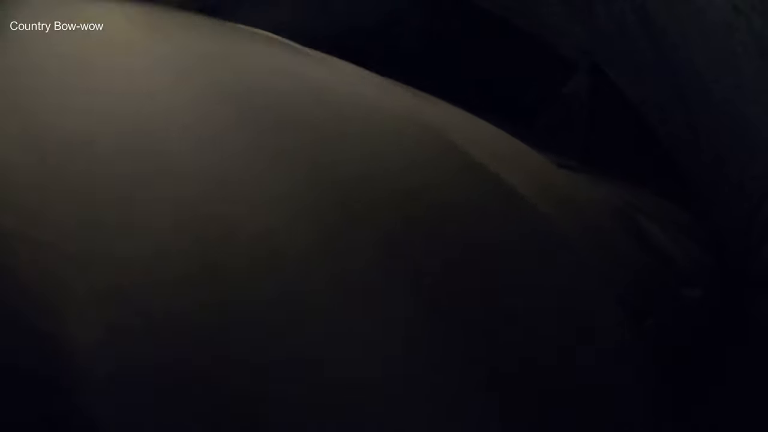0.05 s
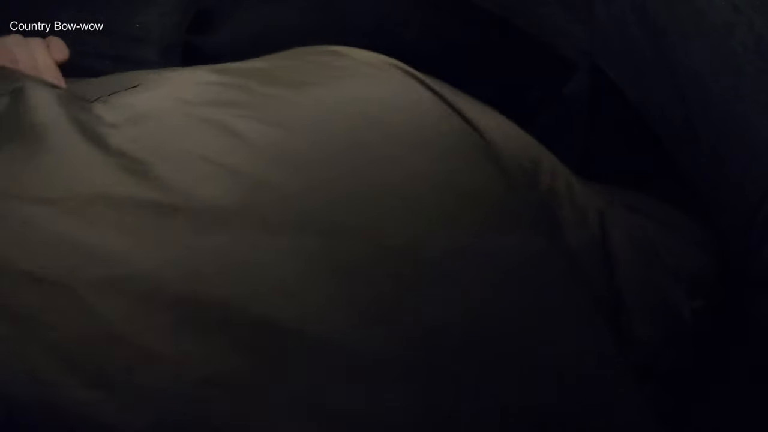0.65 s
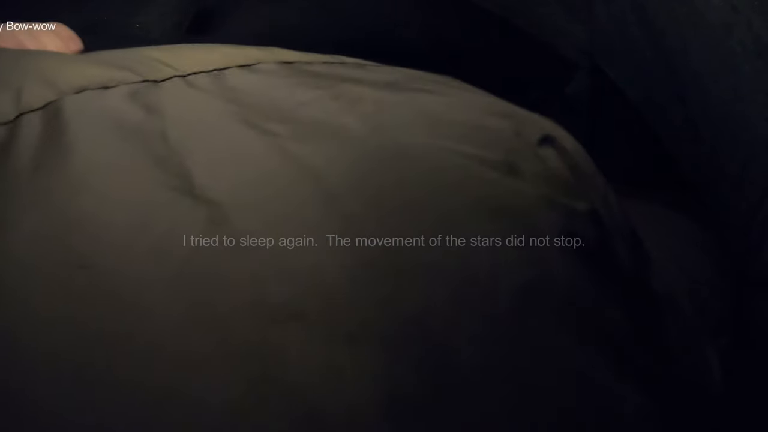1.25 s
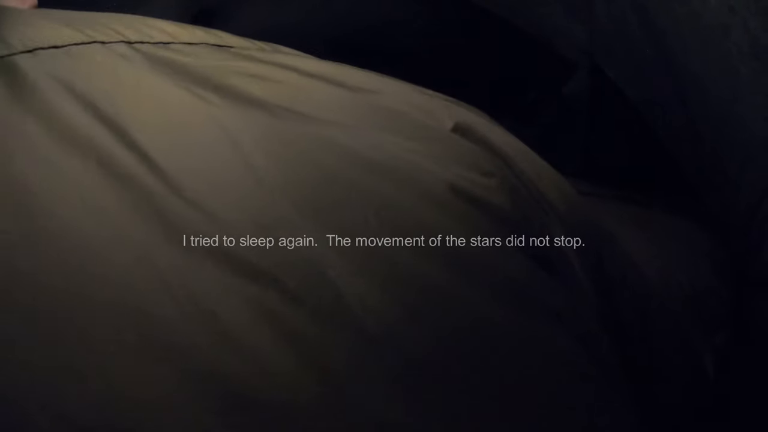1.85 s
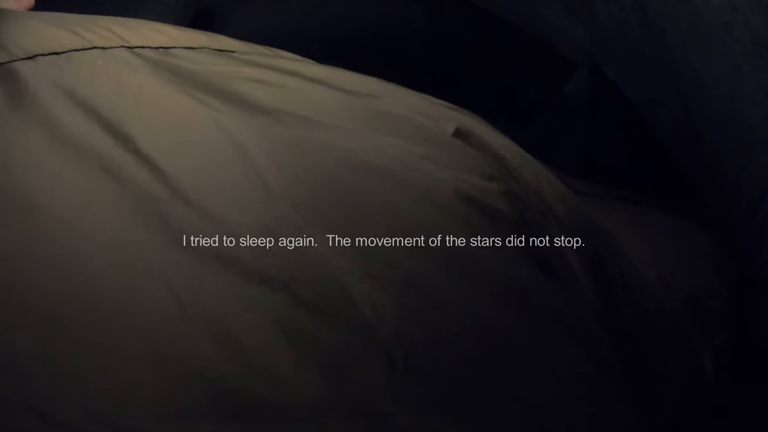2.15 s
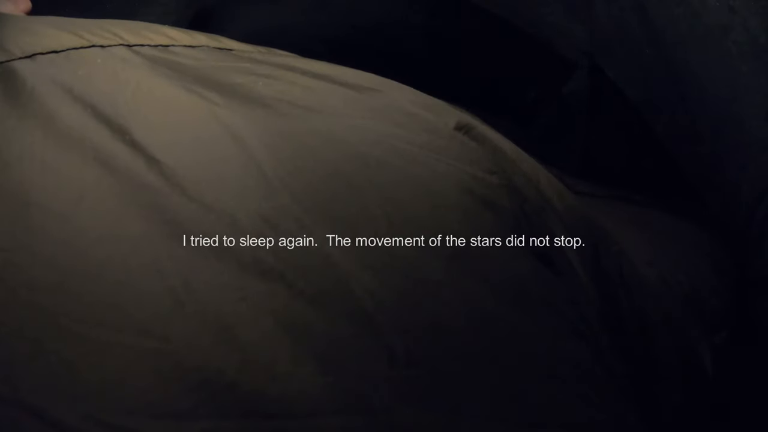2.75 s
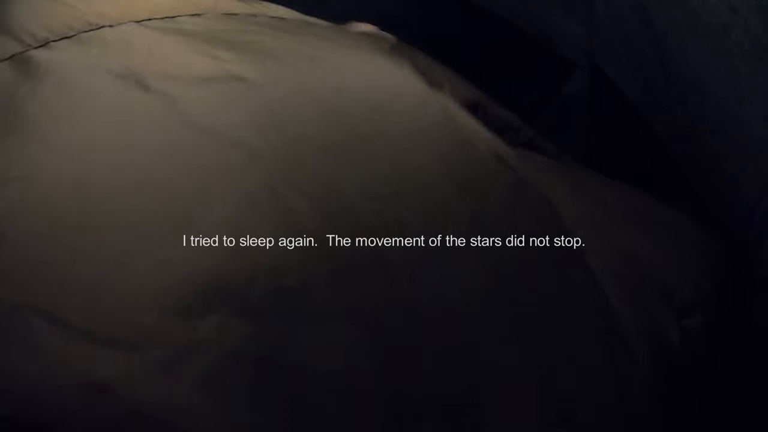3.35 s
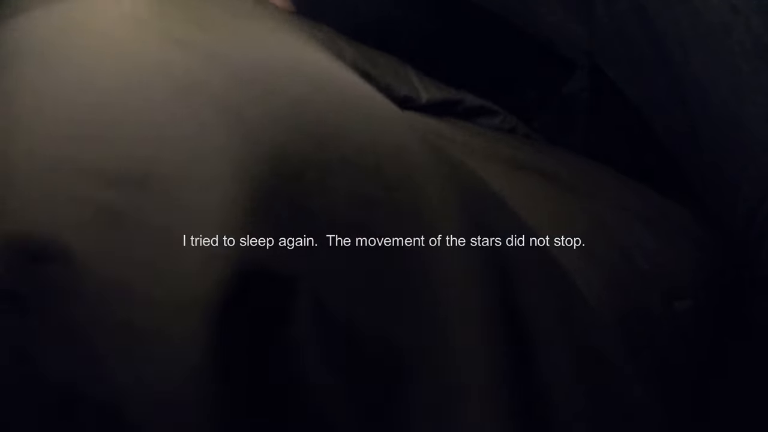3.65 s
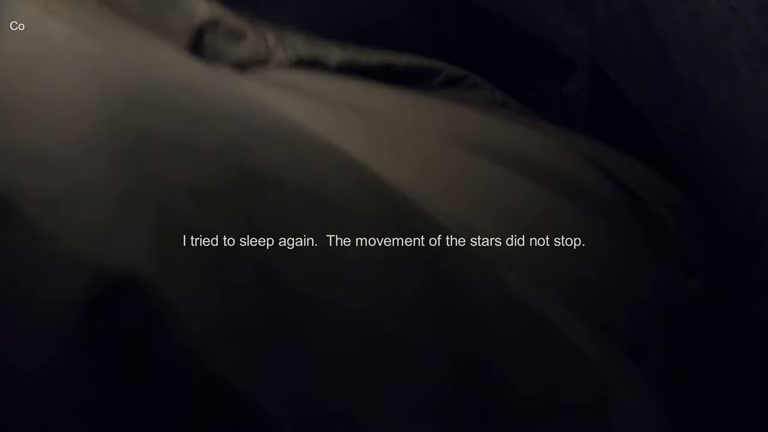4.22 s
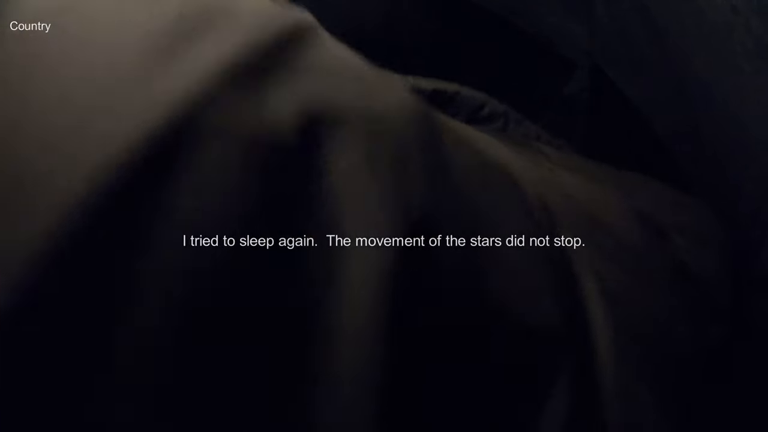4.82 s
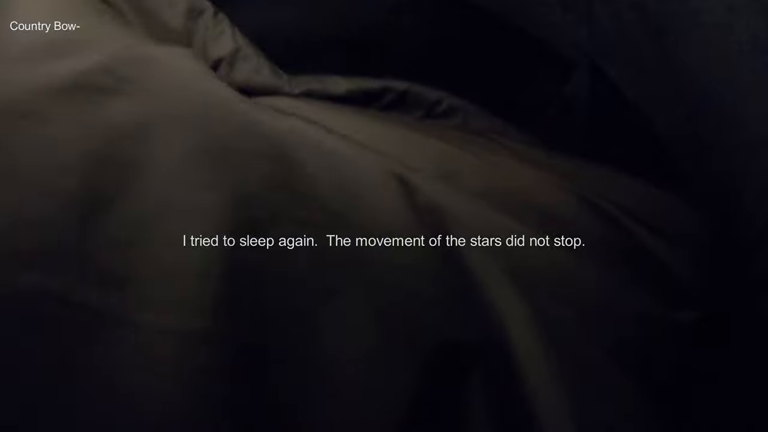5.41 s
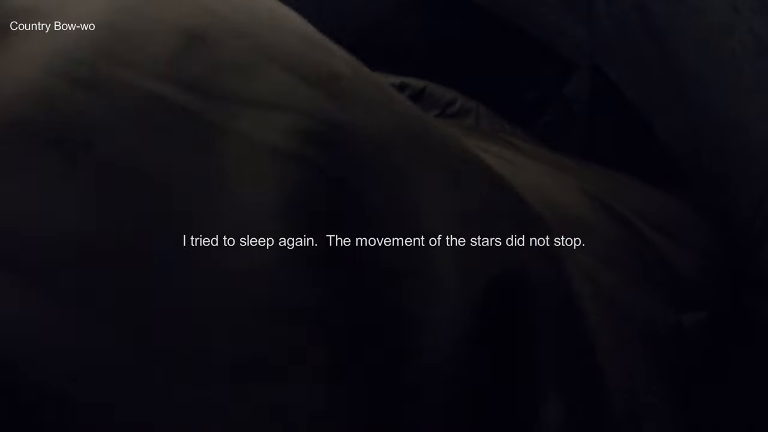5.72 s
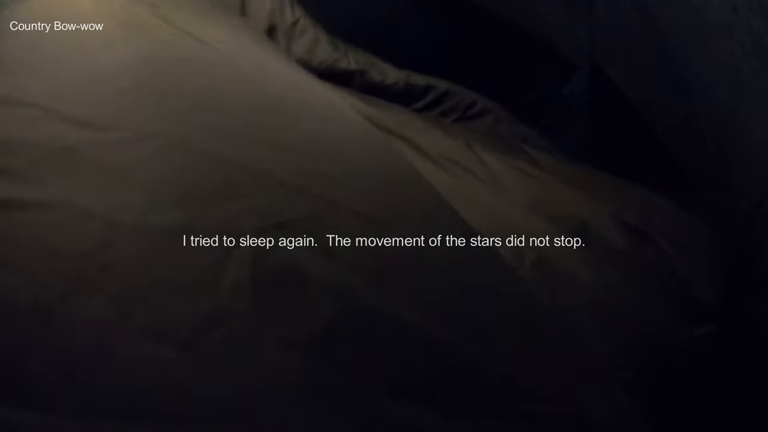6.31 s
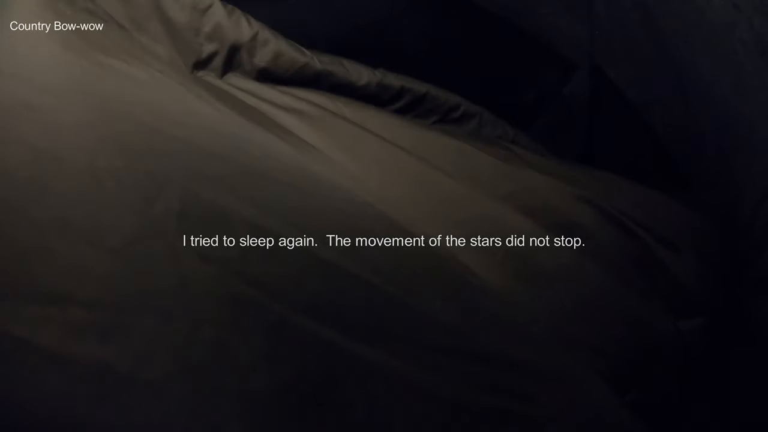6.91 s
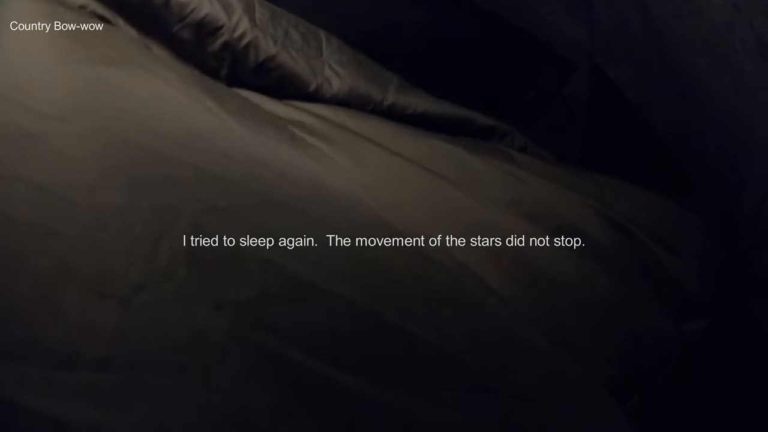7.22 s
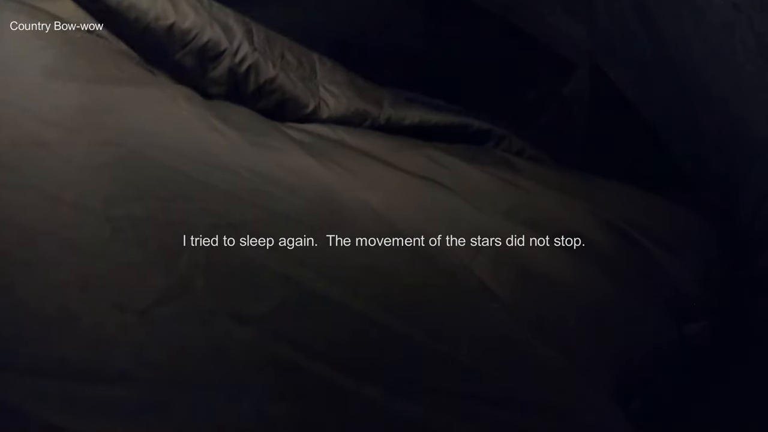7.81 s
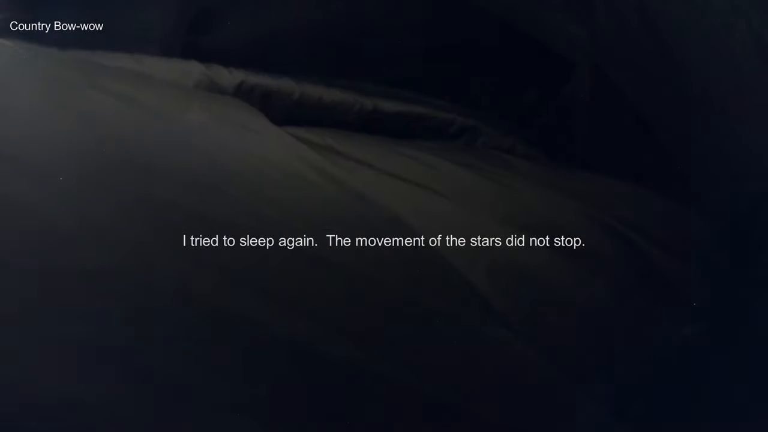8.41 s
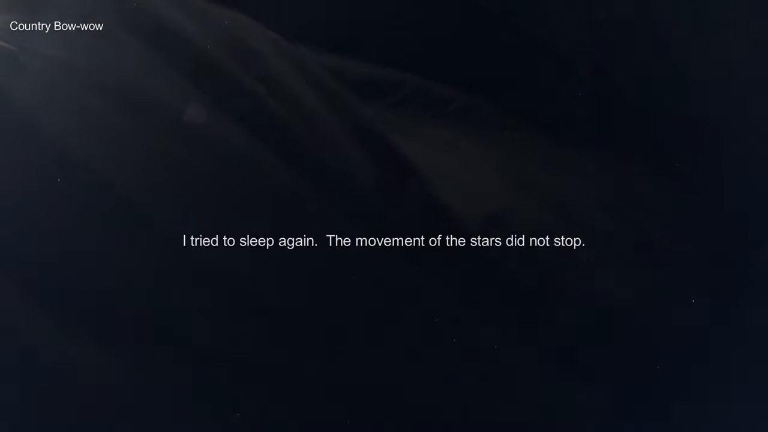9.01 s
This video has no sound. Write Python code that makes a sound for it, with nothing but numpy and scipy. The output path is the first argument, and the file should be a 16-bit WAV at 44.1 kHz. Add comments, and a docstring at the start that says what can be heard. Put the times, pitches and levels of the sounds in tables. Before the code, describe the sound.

A nylon sleeping bag rustles and crinkles up close as someone shifts in it, with dull bumps and a brief low groan of dragging cloth.

```python
"""A nylon sleeping bag rustles in swells as someone shifts in it, inside a tent, right against a camera.
Its threads slip and its creases crinkle; quick strokes make the weave sing, and a few stiff creases snap.
Once the cloth drags over the camera body, sticking and slipping so fast that it groans.
Folds bump the camera with dull thuds, and the padding pushes puffs of air at the microphones."""
import sys
import numpy as np
from scipy import signal
from scipy.fft import rfft, irfft
from scipy.io import wavfile

SR = 44100
rng = np.random.default_rng(int(sys.argv[2]) if len(sys.argv) > 2 else 0)


def waveform_to_disk(signal):
    """Save audio, clipped to [-1, 1], as 16-bit WAV at the path in sys.argv[1]."""
    frames = np.transpose(np.atleast_2d(signal))
    scaled = np.clip(frames, -1, 1) * 32767
    samples = np.round(scaled).astype(np.int16)
    wavfile.write(sys.argv[1], SR, samples)


N = 403956
TIME = np.arange(N) / SR
FREQ = np.maximum(np.arange(N // 2 + 1) * SR / N, 1)

# cloth dragging over the camera: t/s, slip rate/Hz, level/dB
CLOTH_DRAG = [(3.19, 66.64, -58), (3.31, 62.8, -35), (3.39, 71.3, -24), (3.48, 80.3, -22.5),
              (3.505, 51.3, -28), (3.555, 48.1, -25.5), (3.62, 86.83, -16), (3.645, 129.6, -15.5),
              (3.69, 136.5, -14), (3.745, 100, -12), (3.78, 76.4, -12), (3.815, 116.1, -11.5),
              (3.86, 106.6, -10.5), (3.925, 91.9, -10), (3.98, 91.06, -9.5), (4.01, 116.4, -10),
              (4.05, 122.3, -10), (4.078, 101, -9.5), (4.1, 55, -26), (4.12, 44.7, -45)]


def sliding_nylon(rub_db, body_db, sheen_db, pan_db, slosh_hz=1370, slosh_width_hz=130, slosh_db=7):
    """Countless slipping threads hiss: the padding gives a low body, the smooth face a high sheen."""
    # tone of the sliding cloth: f/Hz, level/dB
    cloth_tone = [(40, -9), (105, -18), (150, 2.5), (300, -1.5), (600, 0), (1150, -5), (1700, -4),
                  (2150, -1), (2600, -1.5), (3300, -5), (4800, -9), (15000, -8.5)]
    # stereo width: f/Hz, side level relative to middle/dB
    stereo_width = [(110, -6), (380, -15.5), (700, -4.5), (1150, 1.5), (1700, -3.5), (2300, -7), (4400, -5),
                    (8100, 1), (15000, -1)]
    # how the two microphone openings colour the sound: f/Hz, left/dB, right/dB
    openings = [(500, 0.5, 1), (750, -0.5, -0.5), (1060, 2.5, -5.5), (1480, 0.5, 0), (2730, -2.5, -4),
                (4930, -1, -1), (6780, -2, 2), (8050, -3, -2), (9400, -0.5, -0.5), (10020, -1.5, -8.5),
                (11400, -16.5, -16.5), (14300, -20.5, -23), (15600, -32, -33)]
    creases = undb(-22) * crinkle(per_s=260, spread_db=2.5, decay_s=0.0019)
    grip = undb(0.53 * wander(19)) * np.sqrt(1 + creases)
    mid, side = rng.standard_normal((2, N)) * grip
    # air sloshing between the openings rings, pushing on one as it pulls on the other
    side = shape(side, colour(stereo_width) * undb(slosh_db * band(slosh_hz, slosh_width_hz)))
    opening_gains = np.array([colour(np.array(openings)[:, [0, k]]) for k in (1, 2)])
    cloth = shape(np.array([mid + side, mid - side]), colour(cloth_tone) * opening_gains)
    # the padding crumples in slower, coarser steps than the face
    crumple = np.sqrt(1 + undb(-13.5) * crinkle(per_s=140, spread_db=2.5, decay_s=0.0027))
    body_share = 1 / (1 + (FREQ / 1700) ** 8)
    sheen_share = 1 / (1 + (5000 / FREQ) ** 6)
    zones = [(body_share, 500, 1400, undb(body_db - 2.87) * crumple),
             (1 - body_share - sheen_share, 1800, 4500, undb(1.14)),
             (sheen_share, 5500, 11000, undb(sheen_db - 1.67))]
    out = 0
    for share, low_hz, high_hz, gain in zones:
        strength = np.std(shape(cloth.mean(axis=0), (FREQ > low_hz) & (FREQ < high_hz)))
        out = out + shape(cloth, share) * gain / strength
    return out * undb(rub_db + np.array([pan_db, -pan_db]) / 2)


def body_shifts(rest_db=-51.5, rest_body_db=-2.5, rest_sheen_db=1.5):
    """Each shift adds its power to a faint, steady creep. Gives rubbing, body, sheen and pan in dB."""
    # the person's movements: start/s, rise/s, hold/s, release/s, rubbing level/dB,
    # relative body/dB, relative sheen/dB, left minus right/dB
    moves = [(-0.24, 0.31, 0.026, 0.11, -28, -6, -1.5, 0), (0.022, 0.21, 0.11, 0.26, -29, -3, -2, 0.3),
             (0.37, 0.15, 0.46, 0.07, -32, -4, -0.5, -0.3), (0.972, 0.23, 0.12, 0.17, -32.5, -4, 0, -2),
             (1.409, 0.11, 0.044, 0.094, -32, -4.5, -1.5, -1),
             (1.59, 0.059, 0.086, 0.129, -37.5, -5, -0.5, -1.6),
             (1.794, 0.15, 0.073, 0.055, -37, -5, -3.0, -1),
             (2.008, 0.072, 0.081, 0.028, -42, -3, -2, -1.6),
             (2.058, 0.23, 0.092, 0.2, -43.2, -5, -0.5, -1.5),
             (2.476, 0.16, 0.079, 0.171, -42.4, -5, -4, -0.5),
             (2.767, 0.12, 0.01, 0.084, -37, -6, -3.3, 0.5),
             (2.893, 0.12, 0.1, 0.04, -40.5, -7, -3.5, -0.6), (3.095, 0.25, 0.14, 0.11, -30, -5, -3, 1),
             (3.475, 0.18, 0.19, 0.14, -26, -6, -4, 1.1), (3.763, 0.23, 0.077, 0.14, -28.5, -3.5, -3.5, 2),
             (3.956, 0.25, 0.13, 0.09, -35.5, -3, -2.5, -0.1),
             (4.28, 0.16, 0.014, 0.15, -30.5, -2.2, -1, -0.9),
             (4.476, 0.093, 0.3, 0.056, -34.5, -2, 0.3, 0), (4.837, 0.099, 0.14, 0.081, -32, -1.2, -1, 0.8),
             (5.049, 0.075, 0.066, 0.395, -30.5, -3, 0, 1),
             (5.224, 0.1, 0.078, 0.083, -32.3, -1.8, -1.5, 1.4),
             (5.287, 0.31, 0.36, 0.076, -35.5, -0.9, -2.5, 0),
             (5.721, 0.28, 0.068, 0.2, -35.5, -2, -3, 0.4), (6.052, 0.15, 0.1, 0.26, -33.5, -2, -1.3, 0.5),
             (6.377, 0.16, 0.096, 0.13, -31.9, -1.2, -1.5, 1.3),
             (6.715, 0.047, 0.033, 0.033, -40.5, -4, -6.5, -0.5),
             (6.767, 0.17, 0.05, 0.14, -38.5, -2.5, -3.5, 0.9),
             (7.016, 0.079, 0.1, 0.24, -38, -2.5, -3, 1.2), (7.075, 0.33, 0.114, 0.048, -42.5, -1, -4, 1.5),
             (7.504, 0.13, 0.01, 0.18, -41, 0.5, -12, 4.0), (7.656, 0.134, 0.35, 0.111, -47, 1, -18, 1.9),
             (7.972, 0.086, 0.24, 0.035, -36.5, -2.5, -4, 1.5), (8.139, 0.14, 0.01, 0.1, -36, -3.5, -3, 0),
             (8.24, 0.41, 0.015, 0.242, -36, -0.2, -3, 2), (8.552, 0.24, 0.18, 0.078, -41.5, -4.5, -2.5, 0)]
    rub = np.full(N, undb(rest_db) ** 2)
    body = rub * undb(rest_body_db) ** 2
    sheen = rub * undb(rest_sheen_db) ** 2
    pan = np.zeros(N)
    for start, rise_s, hold_s, release_s, db, body_db, sheen_db, pan_db in moves:
        power = (undb(db) * gesture(start, rise_s, hold_s, release_s, sag_db=-1.26)) ** 2
        rub += power
        body += power * undb(body_db) ** 2
        sheen += power * undb(sheen_db) ** 2
        pan += power * pan_db
    return 10 * np.log10(rub), 10 * np.log10(body / rub), 10 * np.log10(sheen / rub), pan / rub


def crinkle(per_s, spread_db, decay_s):
    """Tiny creases buckle at random and die away at once. Gives their power, averaging one."""
    sizes = undb(spread_db * np.minimum(rng.standard_exponential(N), 4)) ** 2
    buckles = sizes * (rng.random(N) < per_s / SR)
    power = signal.lfilter([1], [1, -np.exp(-1 / (decay_s * SR))], buckles)
    return power / power.mean()


def nearby_folds(rustle, hollow_hz=1480, hollow_width_hz=800):
    """Cloth close to the microphones muffles the middle pitches and reflects the higher ones."""
    # shading by the folds: t/s, gain around hollow_hz/dB
    shading = [(0, 2.5), (1.0, -2), (1.9, -0.5), (3.1, -4), (3.7, -6.5), (4.3, -2), (6.5, -1.1), (7.5, -2),
               (8.3, 0.5)]
    shade_db, = curves(shading)
    rustle = rustle + (undb(shade_db) - 1) * shape(rustle, band(hollow_hz, hollow_width_hz))
    highs = shape(rustle, 1 / (1 + (650 / FREQ) ** 6))
    return rustle - highs + fold_echo(highs)


def fold_echo(sound, lag_s=0.001069, drift=0.305, echo_db=-11):
    """An echo off the nearest fold cancels some pitches; they shift as its delay wanders."""
    index = np.arange(N)
    echo = [np.interp(index - SR * lag_s * np.exp(drift * wander(1.56)), index, channel)
            for channel in sound]
    return (sound + undb(echo_db) * np.array(echo)) / np.sqrt(1 + undb(echo_db) ** 2)


def singing_weave():
    """Threads of one layer tick across those of another: the faster, the higher the breathy note."""
    # quick strokes: t/s, half length/s, thread crossing rate/Hz, level/dB
    strokes = [(0.073, 0.044, 3750, -30.5), (0.61, 0.14, 2100, -33.5), (1.227, 0.15, 6600, -34),
               (1.25, 0.13, 1490, -35), (2.88, 0.041, 700, -43.5), (3.38, 0.046, 470, -44),
               (3.68, 0.11, 986, -35), (3.72, 0.082, 3160, -41), (4.04, 0.042, 720, -32.5),
               (4.70, 0.07, 8900, -30), (6.31, .05, 6850, -34), (6.55, .07, 6500, -41)]
    return swells(strokes, channels=2, relative_width=0.19)


def crease_snaps(decay_s=0.0038, relative_width=2.2):
    """A stiff crease hisses as it tightens, then flips over with a short tick."""
    # snapping creases: t/s, level/dB, tightening time/s, f/Hz
    creases = [(0.095, -31, 0.05, 4500), (2.620, -30.5, 0.0005, 3500), (2.884, -37, 0.003, 2600),
               (7.645, -39, 0.025, 2600), (8.294, -27, 0.026, 2800), (9.101, -34.5, 0.0004, 4000)]
    treble_cut = 1 + (FREQ / 9800) ** 24
    out = 0
    for s, db, tighten_s, hz in creases:
        strain = np.exp(np.minimum((TIME - s) / tighten_s, (s - TIME) / decay_s))
        out = out + undb(db) * strain * noise(band(hz, hz * relative_width) / treble_cut, (2, N))
    return out


def slip_cycle(jitter=0.022):
    """Dragged cloth sticks and slips, never quite evenly. Gives the cycle's phase and when it drags."""
    hz, _ = curves(CLOTH_DRAG)
    phase = 2 * np.pi * np.cumsum(hz * (1 + jitter * wander(59))) / SR
    dragging = (TIME > CLOTH_DRAG[0][0]) & (TIME < CLOTH_DRAG[-1][0])
    return phase, dragging


def judder(phase, rolloff_db=-11, scrape_db=-1, scrape_hz=230, scrape_width_hz=360):
    """Cloth grips the camera and lets go, twice a cycle if pressed hard. Gives groan and bare motion."""
    # moments when the cloth bears down: t/s, half length/s, pressure/0-1
    grabs = [(3.754, 0.011, 0.72), (3.875, 0.035, 0.3), (3.955, 0.061, 0.86), (4.079, 0.025, 0.54)]
    hz, db = curves(CLOTH_DRAG)
    pressure = sum(force * np.exp(-((TIME - s) / half_s) ** 2) for s, half_s, force in grabs)
    second_slip_db = -17 + 26 * pressure
    second_slip = undb(second_slip_db + 1.1 * wander(50)) * np.sin(2 * phase + 0.61 * wander(32))
    motion = (np.sin(phase) + second_slip) / np.hypot(1, undb(second_slip_db))
    # letting go suddenly adds grit (overtones and a scrape), 9 dB more per octave of slowing
    grit_db = -21 + pressure - 9 * np.log2(hz / hz.max())
    overtones = sum(undb(rolloff_db * (k - 3) + 2.1 * wander(53)) * np.sin(k * phase + 0.5 * wander(49))
                    for k in range(3, 8))
    scrape = unit(noise(band(scrape_hz, scrape_width_hz)) * (2 + motion))
    tone = np.sqrt(2) * (motion + undb(grit_db) * overtones)
    groan = undb(db + 0.36 * wander(40)) * (tone + undb(grit_db + scrape_db) * scrape)
    return groan, motion


def fold_bumps(rub_db, crest_cycles=0.59, damping=3.8, scuff_db=-22):
    """A fold dents in and springs back: one quickly dying swing, with a little scuff."""
    thuds, contact_power = np.zeros((2, N))
    scuff = noise(band(280, 280))
    for s, db, hz in fold_touches(rub_db):
        cycles = np.arange(int(4 * SR / hz)) * hz / SR
        age = cycles / crest_cycles
        force = undb(db) * (age * np.exp(1 - age)) ** damping
        start = s - 0.75 / hz  # the main upward swing lands near time s
        add(thuds, start, -force * np.sin(2 * np.pi * cycles))
        add(contact_power, start, force ** 2)
    return thuds + undb(scuff_db) * np.sqrt(contact_power) * scuff


def fold_touches(rub_db, skip_gap_s=0.0175, skip_jitter_s=0.00174, taps_per_s=4.6, tap_hz=290):
    """Folds bump, skip along and lightly tap the camera. Gives rows of t/s, level/dB, f/Hz."""
    # single bumps: t/s, level/dB, f/Hz
    bumps = [(0.255, -23, 69.5), (0.953, -24.5, 280), (1.252, -29, 60), (1.714, -19.5, 520),
             (2.154, -32, 250), (2.570, -37, 380), (3.029, -28, 300), (3.052, -25.5, 89), (3.118, -35, 170),
             (3.993, -10, 55), (4.103, -2.5, 75), (4.421, -22, 650), (4.452, -6.5, 48), (4.8376, -11, 333),
             (4.89, -19, 330), (5.218, -13, 81), (5.318, -17.5, 120), (5.358, -19.5, 32),
             (5.452, -21.5, 58), (5.601, -17, 46), (5.918, -17, 169), (6.639, -10, 54), (6.654, -8, 142),
             (6.696, -6.5, 51.3), (6.889, -24.5, 330), (7.085, -27, 330), (7.125, -29, 50.3),
             (7.298, -28, 44.6), (7.372, -32, 40), (7.49, -22, 374), (7.634, -21, 280), (8.582, -22.5, 330)]
    # folds that catch and skip: start/s, length/s, first level/dB, first f/Hz
    skip_runs = [(4.43, 0.078, -2.5, 140), (6.247, 0.058, -13.5, 158), (6.565, 0.04, -18.5, 109),
                 (7.479, 0.026, -22.5, 208), (7.655, 0.068, -22, 80)]
    touches = list(bumps)
    for start, length_s, db, hz in skip_runs:
        for age in np.arange(0, length_s, skip_gap_s):
            s = start + age + skip_jitter_s * rng.standard_normal()
            touches.append((s, db - 83 * age, hz * 2 ** (-14 * age)))  # ever weaker and lower
    # chance taps are louder when the rubbing is louder
    for i in np.flatnonzero(rng.random(N) < taps_per_s / SR):
        size, hardness = rng.standard_normal(2)
        touches.append((i / SR, rub_db[i] + 4 * size, tap_hz * 2 ** (0.35 * hardness)))
    return touches


def settle(thuds, hz=30, decay_s=0.026, db=-7):
    """After a dent the padding swings slowly back to rest."""
    age = TIME[:SR // 5]
    ring = np.exp(-age / decay_s) * np.cos(2 * np.pi * hz * age) * 2 / (decay_s * SR)
    return thuds + undb(db) * signal.fftconvolve(thuds, ring)[:N]


def padding_rumble(rise_s=0.056, release_s=0.05, puff_hz=6.4, puff_db=6):
    """The squeezed filling lets out air in uneven puffs and brushes the camera with a dull rumble."""
    # weight pressing air out: start/s, length/s, relative level/dB
    presses = [(0.16, 0.12, -49.5), (1.11, 0.15, -45), (3.246, 0.92, -32.5), (4.45, 0.7, -45.5),
               (5.19, 0.44, -36.5), (5.65, 0.53, -48), (6.524, 0.17, -28.5), (6.82, 0.2, -46),
               (7.058, 0.294, -46), (7.494, 0.24, -39), (8.19, 0.5, -50), (8.887, 0.1, -50)]
    # tone of the pushed air: f/Hz, level/dB
    air_tone = [(12, -9), (32, -1.5), (55, -7.5), (110, -14), (220, -24.5), (500, -51), (1500, -90)]
    # padding brushing the camera: t/s, half length/s, f/Hz, level/dB
    brushes = [(3.255, 0.053, 136, -32), (3.40, 0.098, 187, -33), (4.02, 0.04, 517, -42),
               (4.19, 0.11, 140, -31), (4.455, 0.035, 198, -21.5), (5.33, 0.04, 400, -39),
               (6.262, 0.025, 197, -28.5), (6.57, 0.036, 172, -28), (7.62, 0.036, 170, -35.5),
               (7.69, 0.047, 107, -32), (8.28, 0.069, 168, -34.5), (8.63, 0.06, 129, -43),
               (9.12, 0.029, 140, -44)]
    push = np.zeros(N)
    for start, length_s, db in presses:
        press = gesture(start, rise_s, length_s - rise_s, release_s, sag_db=2.5)  # grows while held
        push = np.hypot(push, undb(db + 5) * press)
    puffs = unit(undb(puff_db * wander(puff_hz)))
    air = push * puffs * noise(colour(air_tone))
    return air + swells(brushes, channels=1, relative_width=0.89)


def swells(table, channels, relative_width):
    """Rubbing noise that swells and fades around one pitch for each row."""
    out = np.zeros((channels, N))
    for s, half_s, hz, db in table:
        swell = np.exp(-((TIME - s) / half_s) ** 2)
        out += undb(db) * swell * noise(band(hz, hz * relative_width), (channels, N))
    return out


def gesture(start, rise_s, hold_s, release_s, sag_db):
    """Gain that rises to one, changes by sag_db while held and falls back to nothing."""
    corners = start + np.cumsum(np.abs([0, rise_s, hold_s, release_s]))
    return np.interp(TIME, corners, [0, 1, undb(sag_db), 0])


def undb(db):
    """Turn decibels into a gain."""
    return 10 ** (np.asarray(db) / 20)


def unit(x):
    """Scale to an average power of one."""
    return x / np.sqrt(np.mean(x ** 2))


def curves(table):
    """Turn each column of a timed table into one value per sample."""
    s, *columns = np.transpose(table)
    return [np.interp(TIME, s, column) for column in columns]


def colour(points):
    """Gain at every frequency from rows of f/Hz, level/dB."""
    hz, db = np.transpose(points)
    return undb(np.interp(np.log(FREQ), np.log(hz), db))


def shape(x, gain):
    """Filter by a gain at every frequency."""
    return irfft(rfft(x) * gain, N)


def band(hz, width_hz):
    """Gain that peaks at one pitch and falls away on both sides."""
    return 1 / (1 + ((FREQ - hz * hz / FREQ) / width_hz) ** 2)


def noise(gain, size=N):
    """Filtered noise with an average power of one."""
    return unit(shape(rng.standard_normal(size), gain))


def wander(hz):
    """A smooth random curve with a spread of one, wobbling at up to about this rate."""
    return noise(1 / (1 + (FREQ / hz) ** 4))


def add(track, s, sound):
    """Mix a sound into a track at s seconds."""
    start = int(np.clip(s * SR, 0, N - 1))
    track[..., start:start + sound.shape[-1]] += sound[..., :N - start]


def scene(lean_db=1.1, rasp=0.24):
    """The rustle in the air is wide; sound through the camera body is central, leaning a little left."""
    phase, dragging = slip_cycle()
    rub_db, body_db, sheen_db, pan_db = body_shifts()
    groan, motion = judder(phase)
    rustle = nearby_folds(sliding_nylon(rub_db, body_db, sheen_db, pan_db)) + singing_weave()
    rustle *= 1 + rasp * dragging * motion  # while the cloth drags, its hiss surges with every slip
    through_camera = dragging * groan + settle(fold_bumps(rub_db)) + padding_rumble()
    lean = undb(np.array([[lean_db], [-lean_db]]) / 2)
    return rustle + crease_snaps() + through_camera * lean


def record(dry):
    """The camera limits the sound to full scale and cuts the highest treble."""
    treble_cut = signal.ellip(8, 0.1, 60, 15650, fs=SR, output="sos")
    return signal.sosfiltfilt(treble_cut, np.clip(dry, -1, 1))


dry = scene()
out = record(dry)
waveform_to_disk(out)
```